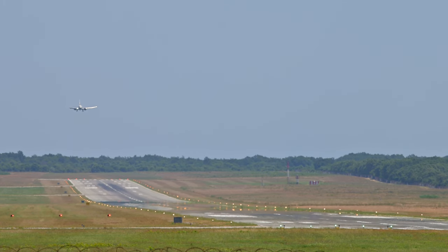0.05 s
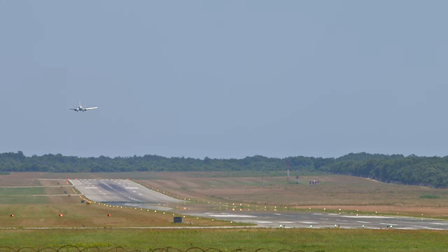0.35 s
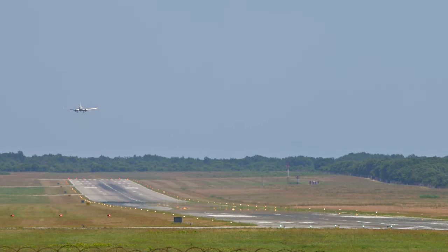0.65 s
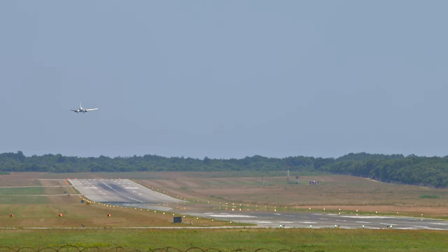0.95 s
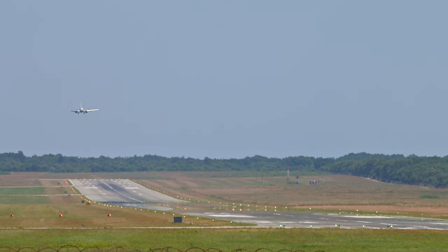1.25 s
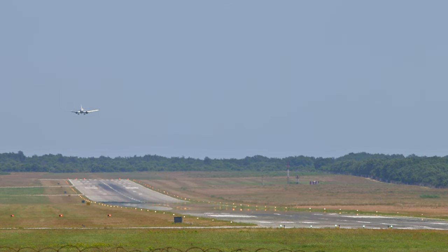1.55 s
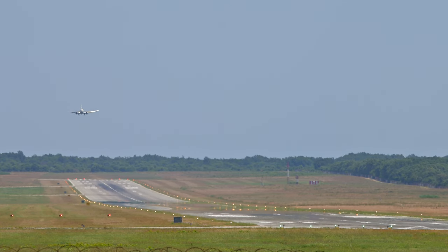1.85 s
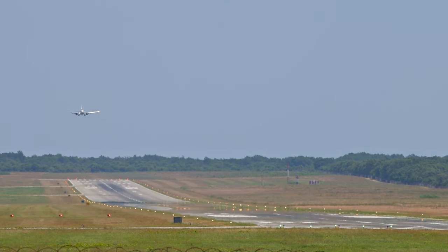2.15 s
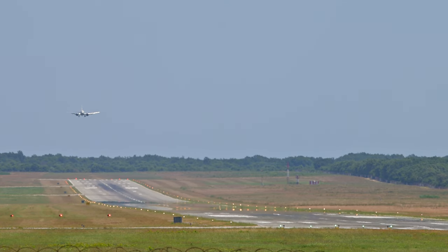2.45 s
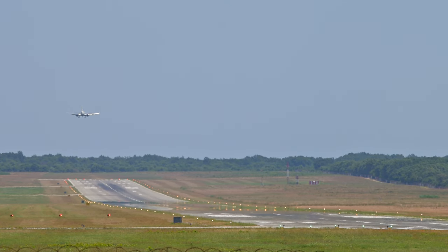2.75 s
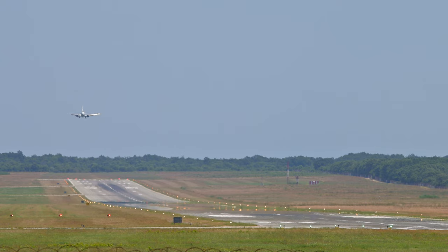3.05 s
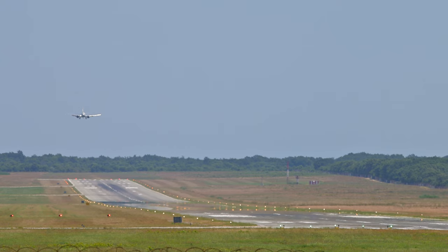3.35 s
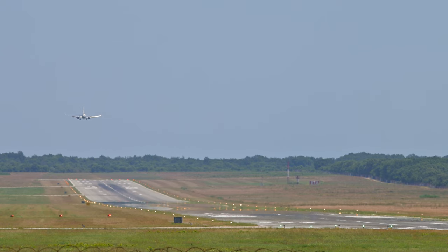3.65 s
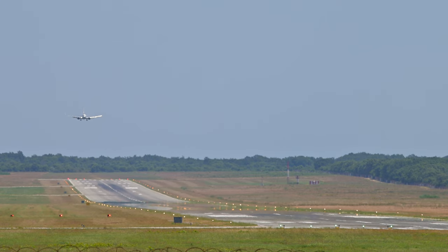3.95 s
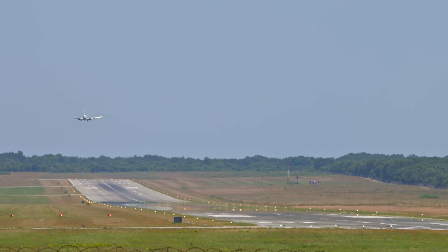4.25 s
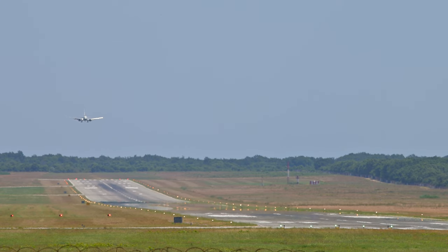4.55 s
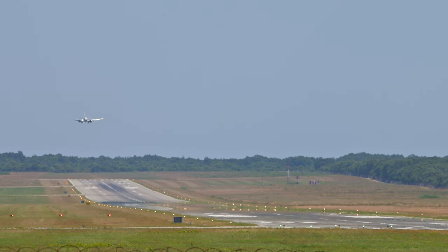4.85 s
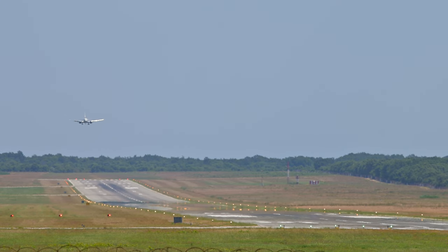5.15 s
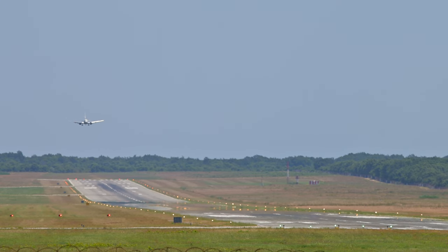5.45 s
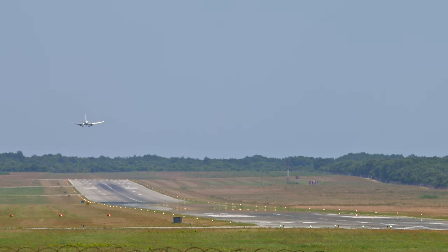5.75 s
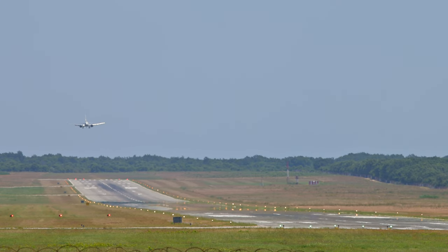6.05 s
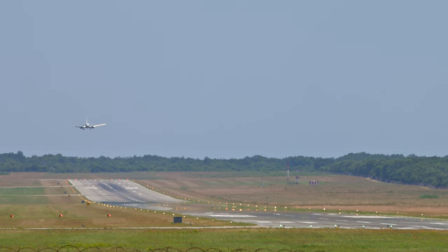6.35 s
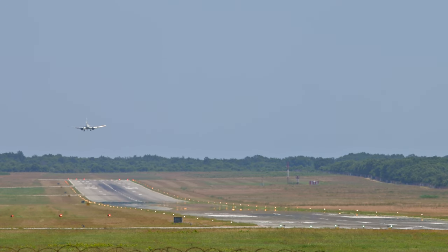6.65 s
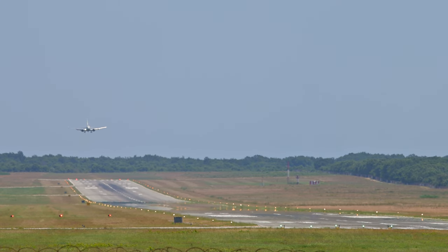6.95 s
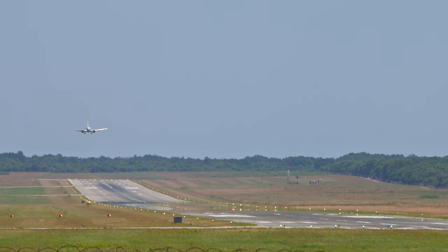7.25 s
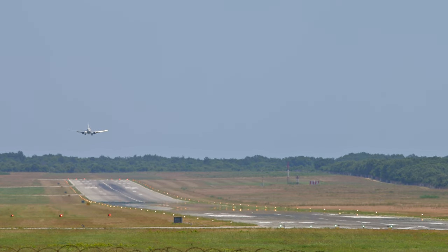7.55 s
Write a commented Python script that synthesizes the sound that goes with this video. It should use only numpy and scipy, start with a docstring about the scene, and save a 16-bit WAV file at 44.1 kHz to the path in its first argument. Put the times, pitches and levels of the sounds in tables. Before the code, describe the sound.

On an open summer airfield, low wind rumbles while a distant jet rushes softly and a far piston engine drones. Two crickets chirp in the grass, and a faint snap comes early on. About five seconds in, one very loud, sharp bang overloads the microphone, followed by dull echo clicks and a soft roll from the tree line. The quiet insects and engines carry on to the end.

```python
"""Low wind and the drone of a distant piston engine open on a summer airfield. A far jet on approach
rushes softly, two bush crickets rasp their wings in the grass, and far insects sizzle.
About five seconds in, one blast, like a bird-scaring gas cannon, overloads the microphone;
the field scatters it and the tree line sends back a dull click and a roll half a second later."""
import sys
import numpy as np
from scipy import signal
from scipy.fft import rfft, irfft, next_fast_len
from scipy.io import wavfile
from scipy.ndimage import map_coordinates

SR = 44100
rng = np.random.default_rng(int(sys.argv[2]) if len(sys.argv) > 2 else 0)


def unload_wav(signal):
    """Save mono or channel-first audio to the path in sys.argv[1] as 16-bit WAV at rate SR, clipped to [-1, 1]."""
    wavfile.write(
        sys.argv[1],
        SR,
        np.round(np.clip(np.atleast_2d(signal).T, -1, 1) * 32767).astype(np.int16),
    )


N = 343980
BLAST_S = 5.2724


def blast(ground_share=0.06):
    """The direct wave and its ground bounce swing to and fro in the microphone's bass roll-off."""
    direct = shock(BLAST_S, push_s=0.014, rise_s=0.00041)
    bounce = ground_share * shock(BLAST_S + .0048, push_s=0.0012, rise_s=.0001)
    return amp(21) * butter(direct + bounce, 110.0, "high", order=3)


def shock(start_s, push_s, rise_s):
    """A blast wave: a push with a steep front, then a longer suction."""
    t = np.arange(N) / SR - start_s
    u = np.maximum(t, 0) / push_s
    return (1 - u) * np.exp(-u) * (1 + np.tanh(t / rise_s)) / 2


def scatter(build_s=0.0018, hold_s=0.14, sag_db_per_s=71.5, release_db_per_s=109, grain_db=1.4):
    """Countless small reflections sag, then die; the later ones have crossed more air and are duller."""
    # tone of the field's reflections: freq_hz, gain_db
    field_eq = [(30, -4), (130, 2), (250, -0.5), (330, 8.5), (480, 8), (580, 6), (900, 6), (1130, 2.5),
                (1420, 9), (2000, 6.5), (4300, 3), (5400, -5.5), (8000, -11.5), (16000, -34)]
    age = np.maximum(np.arange(N) / SR - BLAST_S, 0)
    held = np.minimum(age, hold_s)
    level_db = -15 - sag_db_per_s * held - release_db_per_s * (age - held)
    field = shaped(rng.standard_normal(N) * amp(grain_db * wobble(400)), field_eq)
    hz, t, spectra = signal.stft(field, SR, nperseg=512)
    loss_db_per_khz = np.interp(t - BLAST_S, [0, hold_s], [-0.5, 3.1])
    air = amp(-np.outer(np.minimum(hz, 7000) / 1000, loss_db_per_khz))
    power = np.mean(np.abs(spectra) ** 2, axis=1, keepdims=True)
    air = air / np.sqrt(np.sum(power * air ** 2, axis=0))  # the air sets the colour only
    tail = unit(signal.istft(spectra * air, nperseg=512)[1][:N])
    return (1 - np.exp(-age / build_s)) * amp(level_db) * tail


def ringing(attack_s=0.0034):
    """The blast sets things nearby ringing: a short hard clang, every mode wandering in phase."""
    # ringing modes: pitch_hz, level_db, t60_s
    modes = [(680, -27, .3), (1232, -28, .3), (1367, -24, .25), (1407, -23, .25), (1485, -24, .25),
             (1609, -24, .25), (2266, -21, .25), (2412, -25, .25), (2607, -22, .25), (3513, -27, .22),
             (3896, -27, .22), (4394, -27, .2), (4446, -28, .2)]
    t = np.arange(SR) / SR
    clang = np.zeros(SR)
    for hz, db, t60 in modes:
        drift = rng.uniform(0, 2 * np.pi) + .9 * wobble(70)[:SR]
        clang += amp(db - 60 * t / t60) * np.sin(2 * np.pi * hz * t + drift)
    out = np.zeros(N)
    out[int(BLAST_S * SR):][:SR] = clang * (1 - np.exp(-t / attack_s))
    return out


def echoes():
    """Far obstacles and the tree line slap the blast back as short dull clicks."""
    # distinct echoes: start_s, peak_db, cutoff_hz
    slaps = [(5.5723, -26.5, 1492), (5.8303, -22.5, 1150), (5.8542, -34, 1300), (5.867, -29, 1000),
             (6.154, -36, 1100)]
    out = np.zeros(N)
    for start_s, peak_db, cutoff_hz in slaps:
        click = shock(start_s, push_s=0.002, rise_s=0.000099)
        click = butter(click, cutoff_hz, "low", order=2)
        click = butter(click, 220, "high", order=2)
        out -= amp(peak_db) * click / np.abs(click).max()
    return out


def woods(peak_s=5.803, peak_db=-43, rise_db_per_s=40, fall_db_per_s=23.5, grain_db=2.0):
    """The far trees return the blast as a dull roll that swells and dies away."""
    # tone of the roll: freq_hz, gain_db
    roll_eq = [(40, -18), (130, -3), (250, -3), (340, 3.5), (480, -1), (620, -10), (900, -6), (1500, -10.5),
               (2500, -17), (4300, -25), (9000, -70)]
    t = np.arange(N) / SR
    level_db = peak_db + np.minimum(rise_db_per_s * (t - peak_s), fall_db_per_s * (peak_s - t))
    roll = shaped(rng.standard_normal(N) * amp(grain_db * wobble(120)), roll_eq)
    return (t > BLAST_S) * amp(level_db) * roll


def engine(jitter_s=.00005, spread_db=1.03, fade_db=0.9, lope_db=-6.5):
    """One exhaust pulse per piston firing; moving air makes the drone fade in and out."""
    # engine speed: time_s, firing_hz
    speed = [(0, 57.16), (1.2, 56.24), (1.75, 55.47), (2.1, 53.55), (2.5, 53.88), (3.2, 52.97),
             (4.9, 52.16), (6.2, 54.46), (7.8, 56.91)]
    # tone of the low throb: freq_hz, gain_db
    throb_eq = [(20, -23), (55, 6.5), (112, 6.5), (170, -9.5), (230, -43), (500, -41), (1500, -100)]
    # fader on the throb: time_s, level_db
    throb_fader = [(0, -45.5), (.8, -53), (1.4, -56), (2.1, -63), (2.6, -56), (4.3, -59), (5.5, -57.5),
                   (7, -59.5), (7.8, -70)]
    # tone of the exhaust bark: freq_hz, gain_db
    bark_eq = [(25, -27), (55, -25), (110, -3.5), (165, 3.5), (222, 1.5), (280, -1), (335, -3.5),
               (390, -11), (520, -19.5), (900, -50), (2500, -90)]
    # the bark swells briefly and later comes to stay: time_s, level_db
    bark_fader = [(0, -60), (1.75, -62), (2.1, -52), (2.5, -64), (3.2, -64.5), (5, -55.5), (5.2, -48),
                  (6.4, -49), (7.8, -50.3)]
    cycles = np.cumsum(curve(speed)) / SR
    firings = np.flatnonzero(np.diff(np.floor(cycles)))
    late, size = rng.standard_normal((len(firings), 2)).T
    onsets = np.clip(firings + (late * jitter_s * SR).astype(int), 0, N - 1)
    pulses = np.zeros(N)
    pulses[onsets] = amp(spread_db * size)
    pulses = butter(pulses, 63, "high", order=2)
    throb = amp(curve(throb_fader) + fade_db * wobble(8.4)) * shaped(pulses, throb_eq)
    bark_db = curve(bark_fader)
    bark = amp(bark_db + fade_db * wobble(9.5)) * shaped(butter(pulses, 496, "low", order=4), bark_eq)
    lope = unit(np.sin(3 * np.pi * cycles + wobble(6)))  # uneven running, at 1.5 times the firing rate
    return throb + bark + amp(bark_db + lope_db + 0.69 * wobble(8.7)) * lope


def wind(gust_half_s=0.052):
    """A low, lumpy breeze with a few short gusts."""
    # tone of the rumble: freq_hz, gain_db
    rumble_eq = [(10, -2.5), (28, 0), (55, 4.5), (80, -13), (110, -7), (200, -23.5), (400, -36),
                 (1500, -74)]
    # strength of the breeze: time_s, level_db
    breeze = [(0, -40.5), (1.5, -44.5), (2, -47.5), (2.5, -54.5), (3.2, -55.5), (3.6, -50.5), (4.2, -51),
              (4.75, -45), (5.6, -52.5), (7.8, -55.5)]
    # gusts on top: peak_s, boost_db
    gusts = [(.12, 5), (.41, 5.5), (.84, 2)]
    t = np.arange(N) / SR
    gusts_db = sum(db * np.exp(-((t - s) / gust_half_s) ** 2) for s, db in gusts)
    return amp(curve(breeze) + gusts_db + 1.9 * wobble(9.0)) * noise(rumble_eq)


def jet():
    """Far exhaust noise; its upper band swells when the air carries it well."""
    # tone of the broad rush: freq_hz, gain_db
    rush_eq = [(60, 4.5), (250, 4.5), (450, -1.5), (700, -2), (1050, 2), (1500, -1.5), (2200, -5),
               (3200, -9.5), (4200, -12), (5800, -24), (8000, -31.5), (16000, -48)]
    # the rush sinks and recovers: time_s, level_db
    rush_fader = [(0, -52), (2, -53), (3.2, -54), (4.8, -52), (6.2, -51), (7.8, -52)]
    # tone of the upper hiss: freq_hz, gain_db
    hiss_eq = [(400, -32), (1000, -9.5), (1600, 1.5), (2300, -1.5), (3500, -11.5), (7000, -46),
               (16000, -60)]
    # swells of the hiss: time_s, level_db
    hiss_fader = [(0, -66), (.7, -58.5), (1.8, -56.5), (3, -61), (4.5, -70), (7, -66.5), (7.8, -58.5)]
    rush = amp(curve(rush_fader) + 0.31 * wobble(6.2)) * noise(rush_eq)
    hiss = amp(curve(hiss_fader) + 0.26 * wobble(9)) * noise(hiss_eq)
    return rush + hiss


def crickets():
    """Two bush crickets: the lower one swells and fades, the higher one is steadier."""
    # tempo steps of each singer: first_chirp_s, chirps_per_s
    low_tempo = [(.066, 6.365), (1.637, 8.075), (2.008, 6.51), (5.085, 5.7), (6.135, 7.42)]
    high_tempo = [(.082, 6.271), (3.271, 6.54), (5.11, 5.7), (5.81, 6.25)]
    # wing resonances of each: pitch_hz, width_hz, gain_db
    low_wing = [(4220, 140, -5), (4437, 89, 0.5), (4720, 100, -3), (6300, 1700, -24)]
    high_wing = [(5036, 67, 2.5), (5206, 48, 3.5), (5440, 25, 1), (6550, 780, -18)]
    # swells of the lower song: time_s, level_db
    low_fader = [(.1, -59.5), (.6, -69), (1.1, -62), (1.7, -68), (2.15, -59.5), (2.6, -65), (4, -66),
                 (4.9, -62.5), (5.8, -70), (6.4, -63.5), (7.8, -67)]
    low = cricket(low_tempo, low_wing, curve(low_fader), half_s=0.044, rasp_db=-1, uneven_db=-0.5)
    high = cricket(high_tempo, high_wing, level_db=-66, half_s=0.046, rasp_db=0.5, uneven_db=1.1)
    return low + high


def cricket(tempo, wing, level_db, half_s, rasp_db, uneven_db):
    """Each chirp is a swelling stroke of uneven file teeth that ring the wing."""
    t = np.arange(0, N / SR, 1 / 1000)
    teeth = amp(rasp_db * wobble(300)) * rng.standard_normal(N)
    ends = [s for s, _ in tempo[1:]] + [N / SR + .1]  # each tempo lasts until the next begins
    runs = [np.arange(s, end - .5 / rate, 1 / rate) for (s, rate), end in zip(tempo, ends)]
    strokes = sum(np.exp(-np.abs((t - s) / half_s) ** 4) for s in np.concatenate(runs))
    envelope = np.interp(np.arange(N) / SR, t, strokes)
    return amp(level_db + uneven_db * wobble(5.3)) * envelope * resonant(teeth, wing)


def tick():
    """Something small in the grass gives one faint soft snap."""
    # the snap: start_s, level_db, t60_s
    snap = (.612, -54.5, 0.071)
    start_s, level_db, t60_s = snap
    t = np.arange(N) / SR - start_s
    body = resonant(rng.standard_normal(N), [(3760, 700, 0), (6000, 1200, -11)])
    return (t > 0) * amp(level_db - 60 * np.abs(t) / t60_s) * body


def meadow(trill_hz=11601, pulse_hz=48, pause_s=7.13, pause_half_s=0.076, pause_db=-14):
    """A bed of even hiss, a sizzle of far insects that pauses once, and one thin, pulsing trill."""
    # tone of the hiss: freq_hz, gain_db
    bed_eq = [(3000, -22), (5800, -1.5), (7400, -3), (8100, -5), (12000, -4), (16000, -7.5)]
    # bands the far insects sing in: pitch_hz, width_hz, gain_db
    insects = [(8600, 120, -4), (8960, 200, -2.5), (9600, 330, -2), (10000, 110, 0), (10400, 70, -2),
               (10540, 70, -5), (10890, 170, -5), (11620, 310, -4.5)]
    t = np.arange(N) / SR
    sizzle_db = -76 + pause_db * np.exp(-((t - pause_s) / pause_half_s) ** 2)
    trill = (1 + np.sin(2 * np.pi * pulse_hz * t)) * np.sin(2 * np.pi * trill_hz * t + wobble(25))
    sizzle = amp(sizzle_db + 0.57 * wobble(4)) * resonant(rng.standard_normal(N), insects)
    return amp(-74) * noise(bed_eq) + sizzle + amp(-84.5) * unit(trill)


def amp(db):
    """Decibels to gain."""
    return 10 ** (np.asarray(db) / 20)


def unit(x):
    """Scale to rms 1."""
    return x / np.sqrt(np.mean(x ** 2) + 1e-20)


def curve(points):
    """An automation line through (time_s, value) points, one value per sample."""
    return np.interp(np.arange(N) / SR, *np.transpose(points))


def wobble(rate):
    """A smooth random curve, rate knots a second."""
    return map_coordinates(rng.standard_normal(int(N * rate / SR) + 4), [np.arange(N) * rate / SR])


def filtered(x, response):
    """x through a gain that depends on frequency."""
    size = next_fast_len(N + SR // 2)
    return irfft(rfft(x, size) * response(np.fft.rfftfreq(size, 1 / SR)), size)[:N]


def shaped(x, eq):
    """x through an EQ of (freq_hz, gain_db) points on a log axis, at rms 1."""
    freq_hz, gain_db = np.transpose(eq)
    return unit(filtered(x, lambda hz: amp(np.interp(np.log(hz + 1), np.log(freq_hz + 1), gain_db))))


def noise(eq):
    """Coloured noise of rms 1."""
    return shaped(rng.standard_normal(N), eq)


def resonant(x, modes):
    """x through (pitch_hz, width_hz, gain_db) resonances, at rms 1."""
    power = lambda f: sum(amp(db) ** 2 / (1 + ((f - hz) / width) ** 2) ** 2 for hz, width, db in modes)
    return unit(filtered(x, lambda f: np.sqrt(power(f))))


def butter(x, hz, kind, order):
    """A causal low-pass or high-pass."""
    return signal.sosfilt(signal.butter(order, hz, kind, fs=SR, output="sos"), x)


def scene():
    """The blast and its tail over the airfield ambience, at one microphone."""
    bang = blast() + ringing() + scatter() + woods() + echoes()
    return (bang + crickets() + engine() + wind() + jet() + meadow() + tick())[None]


def record(dry):
    """The input clips at full scale, then the very top is cut away."""
    top_hz = 15750
    clipped = np.clip(dry[0], -1, 1)
    return filtered(clipped, lambda hz: np.clip((top_hz - hz) / 200 + .5, 0, 1))[None]


dry = scene()
out = record(dry)
unload_wav(out)
```